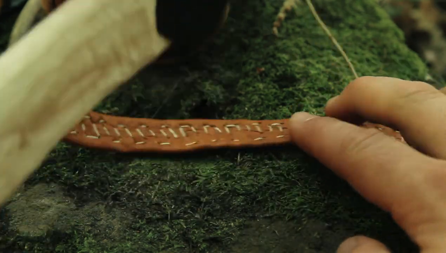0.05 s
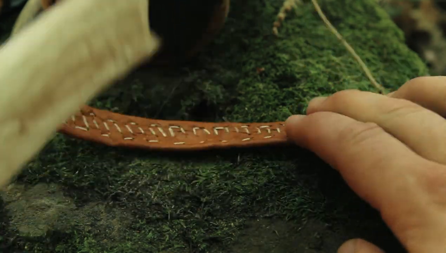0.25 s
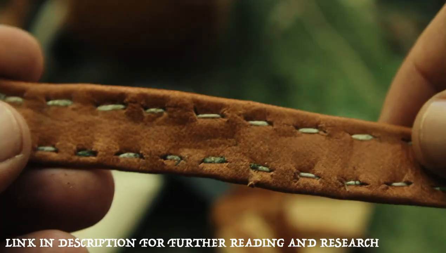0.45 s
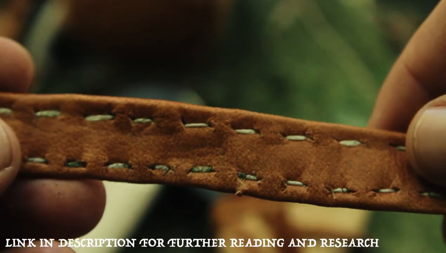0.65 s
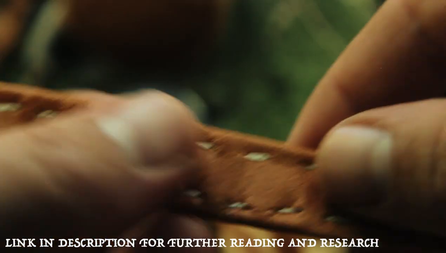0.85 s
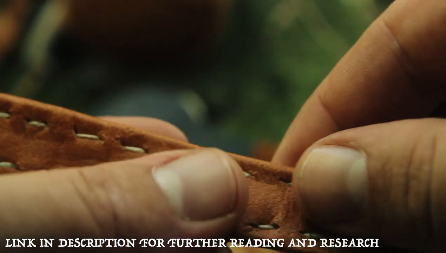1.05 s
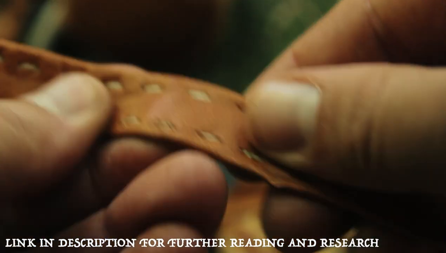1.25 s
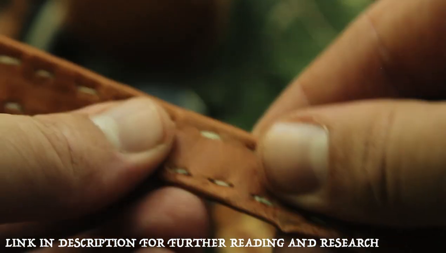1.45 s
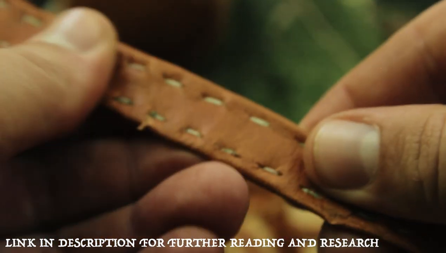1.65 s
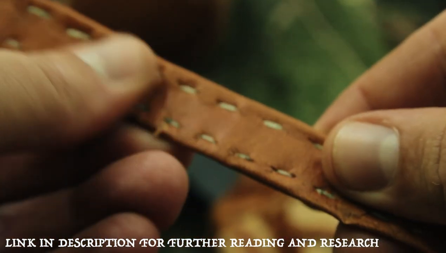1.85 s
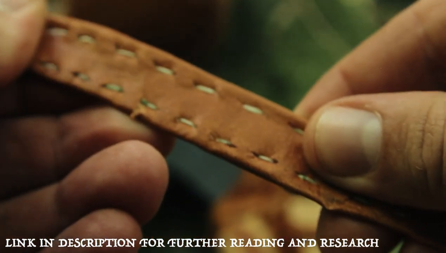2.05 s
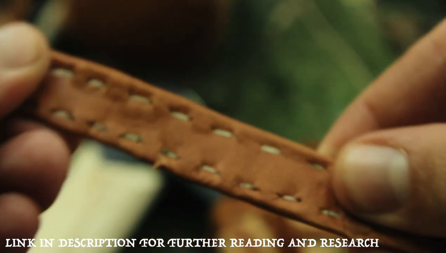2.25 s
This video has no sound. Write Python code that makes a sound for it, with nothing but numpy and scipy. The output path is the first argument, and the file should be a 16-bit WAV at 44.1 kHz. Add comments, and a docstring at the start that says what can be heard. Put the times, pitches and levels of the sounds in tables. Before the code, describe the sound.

A wooden mallet knocks on a leather strap on a log, lightly at the start and hard at 0.2 seconds, each blow dry with a low thump. From about 0.9 seconds to 2.4, fingers softly rub and flex the leather close by, with small ticks and a low microphone bump around 1.4. A quiet forest rush lies behind, with very faint bird whistles in the first second.

```python
"""Two dry knocks, light then hard: a wooden mallet hits a leather strap lying on a mossy log.
The log's damped modes ring briefly and each blow jolts the microphone stand into a low thump.
The scene cuts to a close-up: fingers rub and flex the stitched strap, skin hissing over the grain,
stitches and nails ticking, and bump the stand a few times.
Behind it all are the low rush of a forest and faint, thin bird whistles."""
import sys
import numpy as np
from scipy import signal
from scipy.fft import rfft, irfft
from scipy.io import wavfile

SR = 44100
rng = np.random.default_rng(int(sys.argv[2]) if len(sys.argv) > 2 else 0)


def output_pcm(signal):
    """Save a mono or channel-first signal as 16-bit PCM at the path in sys.argv[1].

    Samples are clipped to [-1, 1] before scaling.
    """
    pcm = np.clip(np.atleast_2d(signal).T, -1, 1) * 32767
    wavfile.write(sys.argv[1], SR, np.round(pcm).astype(np.int16))


N = 105840
T = np.arange(N) / SR
CUT_S, CROSSFADE_S = 0.386, 0.004   # from the wide scene to the close-up
LOW_CUT_HZ, HIGH_CUT_HZ, OVERLOAD_LEVEL = 48, 15700, 0.93


def from_db(db):
    return 10 ** (np.asarray(db) / 20)


def unit_rms(x):
    return x / np.sqrt(np.mean(x ** 2) + 1e-20)


def at_hz(points, hz):
    freqs, values = np.transpose(points)
    return np.interp(np.log(hz), np.log(freqs), values)


def panned(x, left_db):
    return x * from_db(np.array([[left_db], [-left_db]]) / 2)


def attack(start, rise):
    """A smooth rise from 0 to 1."""
    return 1 - np.exp(-np.maximum(T - start, 0) / rise)


def decay(start, t60):
    """Silence, then an exponential fall from 1."""
    return (T >= start) * np.exp(-np.log(1000) * np.clip((T - start) / t60, 0, 10))


def ring(start, hz, t60):
    """One struck mode."""
    return decay(start, t60) * np.sin(2 * np.pi * hz * (T - start))


def band(x, hz):
    """Two octaves about a centre; rms 1."""
    edges = [hz / 2, min(hz * 2, SR / 2 - 1000)]
    return unit_rms(signal.sosfilt(signal.butter(2, edges, "band", fs=SR, output="sos"), x))


def noise(hz, shape=N):
    return band(rng.standard_normal(shape), hz)


def stereo_noise(spectrum, correlation):
    """Noise with a given colour and left-right correlation; rms 1."""
    hz = np.maximum(np.fft.rfftfreq(N, 1 / SR), 1)
    colour = from_db(at_hz(spectrum, hz)) * (hz < HIGH_CUT_HZ)
    mid, side = rfft(rng.standard_normal((2, N))) * colour
    alike = np.clip(at_hz(correlation, hz), -1, 1)
    return unit_rms(irfft(np.sqrt(1 + alike) * mid + np.sqrt(1 - alike) * side * [[1], [-1]], N))


# Mallet hits (time [s], gain [dB], position [0 = the log's soft spot, 1 = its edge])
BLOWS = [(0.0, -16.5, 1), (0.2176, 1.5, 0.21)]
def mallet():
    """Each blow: a woody body, a bright crack, width from the ground and a tail from the trees."""
    out = 0
    for start, db, edge in BLOWS:
        body = wood_body(start, edge) * attack(start, rise=0.0007)   # the leather cushions the contact
        crack = from_db(-20) * noise(hz=7100) * decay(start, t60=0.0096) * attack(start, rise=0.0014)
        tree_scatter = from_db(-40) * noise(hz=1430, shape=(2, N)) * decay(start, t60=0.11)
        ground_bounce = from_db(-23.5) * noise(hz=1200) * decay(start, t60=0.048) * [[1], [-1]]
        out += from_db(db) * (panned(body + crack, left_db=1) + tree_scatter + ground_bounce)
    return out


# Modes of mallet and log (pitch [Hz], level at the soft spot [dB], change at the edge [dB], t60 [s])
WOOD_MODES = [(189, -26, 19.5, 0.026), (363, -6, 1.5, .024), (556, -2.5, -16.5, 0.016),
              (744, 8.5, -21, 0.0082), (1027, -1.5, -11, 0.015), (1299, -3.5, 1, 0.016),
              (1620, -7.5, -15, 0.02), (2012, -10, -2.5, .01), (2830, -15, 0.5, .008),
              (3464, -13, -2.5, 0.01153), (3776, -44, 14.5, 0.063), (4380, -24.5, 2, .015),
              (5470, -22.5, 2, 0.01), (6470, -30.5, -1.5, 0.016), (7610, -34, -1, 0.015)]
def wood_body(start, edge):
    """Heavily damped wood modes, balanced by where the blow lands."""
    inverted = (0, 1, 3, 8)   # these modes start by moving away from the microphone
    return sum((-1 if k in inverted else 1) * from_db(db + edge * edge_db) * ring(start, hz, t60)
               for k, (hz, db, edge_db, t60) in enumerate(WOOD_MODES))


# Jolts to the stand (time [s], gain [dB], tilt about 100 Hz [dB/octave], push time [s])
STAND_JOLTS = [(0.002, -30.5, 2, 0.0011), (0.228, -28.5, 6, 0.0101), (0.885, -55.5, -12, .015),
               (1.138, -38, 7.5, 0.023), (1.265, -45.5, -2, 0.0066), (1.3501, -30, 1.5, 0.0015),
               (1.3585, -39, 11, 0.0015), (1.3925, -45.5, 12.5, 0.0014), (1.405, -36.5, -10.5, 0.0047),
               (1.55, -57, 9, 0.0086), (1.68, -46.5, 8.5, 0.023)]
# Stand modes (pitch [Hz], left gain [signed], right gain [signed], t60 [s])
STAND_MODES = [(63.2, .62, -0.6, 1), (79, 1, -0.46, 0.33), (95, 0.7, 0.046, 0.26),
               (122.4, 0.54, -0.72, 0.17), (173.9, 0.35, 0.41, 0.22), (200.4, 0.17, 1.96, 0.038),
               (232, -0.14, 0.21, 0.216), (308.6, .05, 0.1, 0.103), (368, .07, .14, 0.05),
               (630, -0.043, .04, 0.052)]
def stand_thumps(since, until):
    """The jolted stand rings low and rocks the two capsules, mostly against each other."""
    out = np.zeros((2, N))
    for start, db, tilt_db, push in STAND_JOLTS:
        if since <= start < until:
            for hz, left, right, t60 in STAND_MODES:
                gain = from_db(db + tilt_db * np.log2(hz / 100))
                out += gain * ring(start, hz, t60) * attack(start, push) * [[left], [right]]
    return out


# Finger strokes (peak time [s], rise [s], fall [s], level [dB])
FINGER_STROKES = [(0.028, 0.09, 0.018, -61), (0.097, 0.019, 0.032, -58.5), (0.26, 0.15, 0.024, -67),
                  (0.375, 0.017, 0.01, -64.5), (0.95, 0.017, 0.038, -61), (1.10, .03, 0.02, -72.5),
                  (1.229, 0.022, 0.018, -57), (1.28, 0.036, 0.049, -60.5), (1.418, 0.014, 0.026, -59),
                  (1.495, 0.019, 0.012, -66), (1.559, 0.014, 0.022, -60.5), (1.605, 0.026, 0.046, -58),
                  (1.779, 0.025, 0.043, -56.5), (1.885, 0.043, 0.075, -60), (2.02, 0.042, 0.043, -62.5),
                  (2.262, 0.035, 0.041, -54.5), (2.37, 0.025, 0.022, -61)]
# Colour of skin on leather (frequency [Hz], relative density [dB])
RUB_COLOUR = [(1500, -8), (2500, -6.5), (4000, -2.5), (6300, -1), (8000, -1.5), (11000, 1.5), (12500, 1),
              (15500, -10.5)]
# Stereo image of the rub (frequency [Hz], left-right correlation [0-1])
RUB_IMAGE = [(1500, 1), (6000, 0.26), (14000, 0.5)]
def leather_rub():
    """Skin slides over leather: a fine hiss with tiny catches of the grain, swelling with each stroke."""
    squareness = 2.1   # 2 is a bell-shaped stroke; more starts and stops it more abruptly
    wobble_db, catches_per_s, catch_spread_db = 1.5, 2800, 3.5
    power = 0
    for peak, rise, fall, db in FINGER_STROKES:
        from_peak = np.abs(T - peak) / np.where(T < peak, rise, fall)
        power += from_db(db) ** 2 * np.exp(-from_peak ** squareness)
    uneven_pressure = from_db(wobble_db * noise(hz=45))
    catches = (rng.random(N) < catches_per_s / SR) * rng.choice([-1, 1], N)
    strength = from_db(catch_spread_db * np.minimum(rng.exponential(1, N), 5))
    grain = from_db(-19) * band(catches * strength, hz=7880)
    hiss = stereo_noise(RUB_COLOUR, RUB_IMAGE)
    return np.sqrt(power) * uneven_pressure * (hiss + grain)


# Ticks on the strap (time [s], level [dB], centre [Hz], t60 [s], pan to the left [dB])
STRAP_TICKS = [(0.093, -47.5, 8300, 0.026, -2), (0.2142, -40, 2180, 0.03, -2.4),
               (0.856, -61, 8000, 0.013, 6), (1.347, -45.5, 1780, 0.014, -1.5),
               (1.3475, -52.5, 6900, 0.02, -7), (1.389, -47.5, 1480, 0.023, 6),
               (1.40, -56.5, 4500, 0.03, -6), (2.09, -61, 4130, 0.01, 3)]
def strap_ticks():
    """Dry ticks: the mallet's first touch just before the hard knock, and stitches and nails
    as the strap is handled."""
    return sum(panned(from_db(db) * noise(hz) * decay(start, t60), left_db)
               for start, db, hz, t60, left_db in STRAP_TICKS)


# Light taps on the stand (time [s], level [dB])
STAND_TAPS = [(1.3505, -48.5), (1.3904, -39.5)]
# Ring of one tap (pitch [Hz], relative level [dB], t60 [s])
TAP_RING = [(1276, -2, 0.028), (1366, -1, 0.04), (2250, -15, 0.026), (2930, -28, .018)]
def stand_taps():
    """Small hard contacts ring briefly on top of the close-up's biggest bump."""
    return sum(from_db(db + mode_db) * ring(start, hz, t60)
               for start, db in STAND_TAPS for hz, mode_db, t60 in TAP_RING)


# Distant bird notes (time [s], length [s], pitch [Hz], level [dB])
BIRD_NOTES = [(0.045, 0.057, 7900, -64), (0.681, 0.17, 3770, -71.5), (0.913, .09, 3490, -72)]
def birds():
    """Thin, pulsing whistles that waver in pitch, start quickly and fade."""
    waver_hz, attack_s, pulses_per_s, pulse_depth = 18, 0.03, 30.6, 0.63
    out = 0
    for start, length, hz, db in BIRD_NOTES:
        age = T - start
        pitch = hz + waver_hz * noise(hz=60)
        envelope = np.clip(age / attack_s, 0, 1) * np.sqrt(np.clip(1 - age / length, 0, 1))
        pulse = 1 + pulse_depth * np.sin(2 * np.pi * pulses_per_s * age)
        out += from_db(db) * envelope * pulse * np.sin(2 * np.pi * np.cumsum(pitch) / SR)
    return out


# Fader ride of the far rush (time [s], level [dB])
RUSH_RIDE = [(0.5, -78.5), (0.7, -63.5), (0.95, -63.5), (1.15, -58), (1.32, -58), (1.6, -54.5), (1.75, -59),
             (1.85, -55.5), (2.03, -61), (2.25, -57.5), (2.4, -60)]
# Colour of the rush (frequency [Hz], relative density [dB])
RUSH_COLOUR = [(100, -3), (220, -3.5), (400, -6), (700, 2.5), (930, 0), (1400, -12.5), (2000, -14.5),
               (2800, -25.5), (5000, -33)]
# Fader ride of the distant rumble (time [s], level [dB])
RUMBLE_RIDE = [(0.4, -69.5), (0.8, -62.5), (1.2, -65), (1.7, -73), (2.4, -71.5)]
# Colour of the rumble (frequency [Hz], relative density [dB])
RUMBLE_COLOUR = [(35, -33), (56, -4), (69, 17.5), (80, -28), (110, -42)]
def far_forest():
    """A far rush and a low rumble swell and ebb behind the close-up."""
    rush = from_db(np.interp(T, *np.transpose(RUSH_RIDE))) * forest_noise(RUSH_COLOUR)
    rumble = from_db(np.interp(T, *np.transpose(RUMBLE_RIDE))) * forest_noise(RUMBLE_COLOUR)
    return rush + rumble


# Colour of the air in the wide scene (frequency [Hz], relative density [dB])
WIDE_AIR_COLOUR = [(30, 2), (90, 5.5), (230, -3), (600, -5.5), (1150, -1), (1600, -9), (2300, -19),
                   (3400, -23), (7000, -26), (13000, -35.5), (15500, -43)]
# Colour of the air in the close-up (frequency [Hz], relative density [dB])
CLOSE_AIR_COLOUR = [(30, -28), (50, -21), (100, -7), (250, -4.5), (500, -7), (900, -10), (1300, -12.5),
                    (2300, -21), (4500, -24.5), (8000, -29), (15500, -31.5)]
def forest_air():
    """Two steady, dark beds of air: one for the wide scene, a quieter one for the close-up."""
    return from_db(-50) * forest_noise(WIDE_AIR_COLOUR), from_db(-59) * forest_noise(CLOSE_AIR_COLOUR)


# Stereo image of the forest (frequency [Hz], left-right correlation [0-1])
FOREST_IMAGE = [(60, 0.58), (150, 0.58), (400, 0.74), (1000, 0.74), (2400, 0.56), (6000, 0.13), (14000, .1)]
def forest_noise(colour):
    """Outdoor noise, fairly centred in the lows and mids, wide in the treble."""
    return stereo_noise(colour, FOREST_IMAGE)


def scene():
    """The wide scene cuts to the close-up; rubbing, ticks and birds run through both."""
    wide_air, close_air = forest_air()
    wide = mallet() + stand_thumps(0, CUT_S) + wide_air
    close = stand_thumps(CUT_S, np.inf) + stand_taps() + far_forest() + close_air
    cut = np.clip((T - CUT_S) / CROSSFADE_S + 0.5, 0, 1)
    return (1 - cut) * wide + cut * close + leather_rub() + strap_ticks() + birds()


def record(dry):
    """The deepest bass is rolled off, the hard blow overloads the input, the top is cut."""
    low_cut = signal.butter(2, LOW_CUT_HZ, "high", fs=SR, output="sos")
    high_cut = signal.ellip(10, 0.1, 70, HIGH_CUT_HZ, fs=SR, output="sos")
    overloaded = np.clip(signal.sosfilt(low_cut, dry), -OVERLOAD_LEVEL, OVERLOAD_LEVEL)
    return signal.sosfilt(high_cut, overloaded)


dry = scene()
out = record(dry)
output_pcm(out)
```